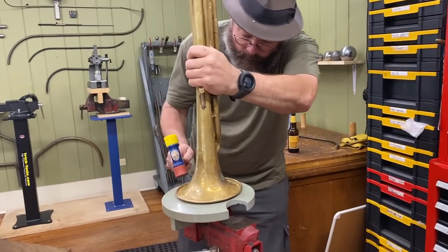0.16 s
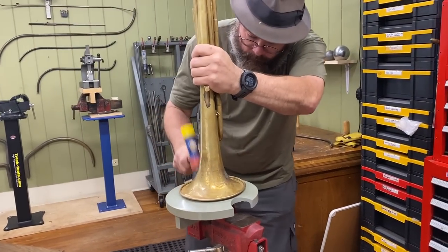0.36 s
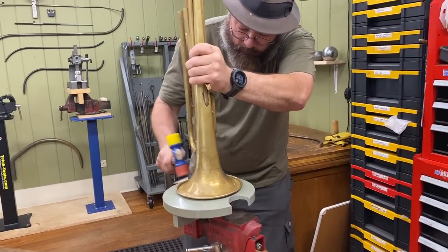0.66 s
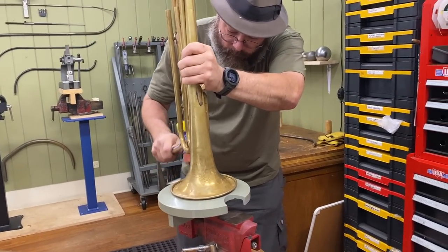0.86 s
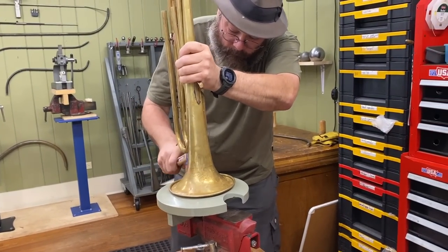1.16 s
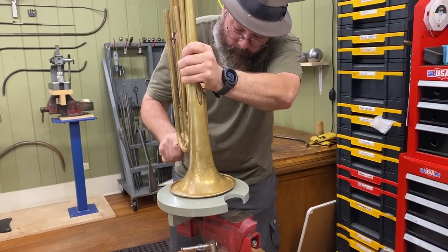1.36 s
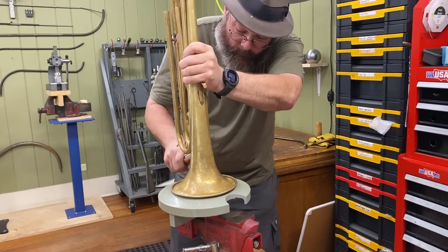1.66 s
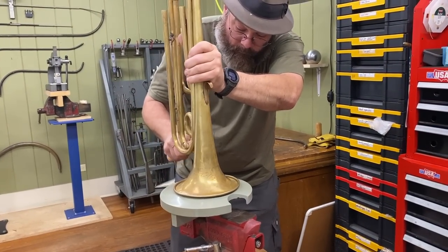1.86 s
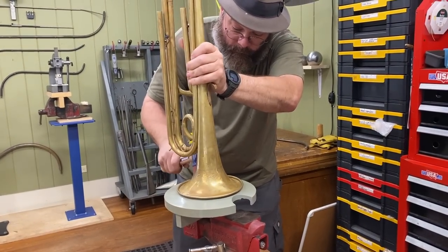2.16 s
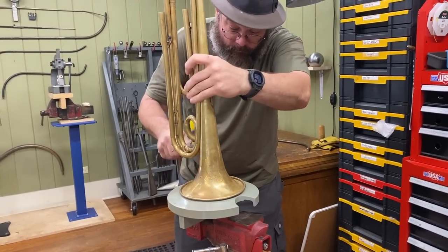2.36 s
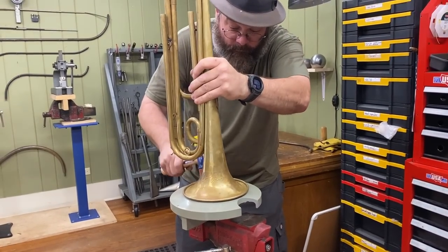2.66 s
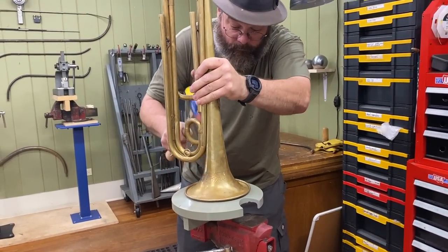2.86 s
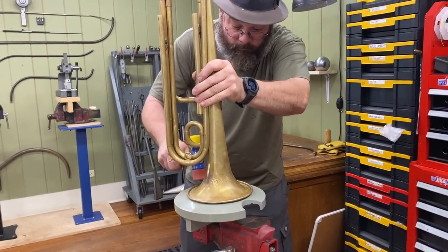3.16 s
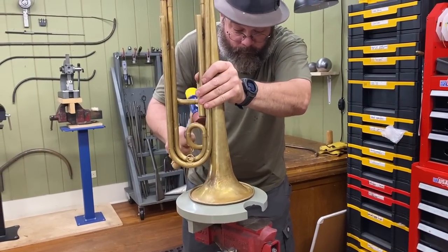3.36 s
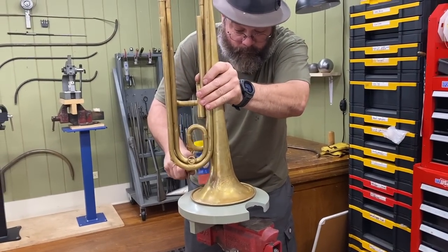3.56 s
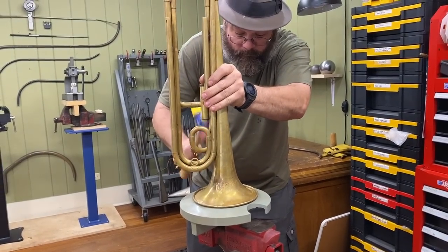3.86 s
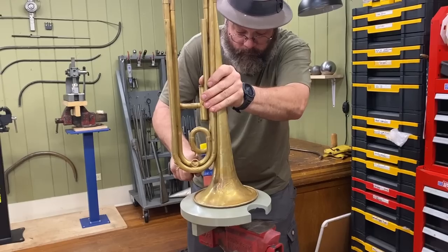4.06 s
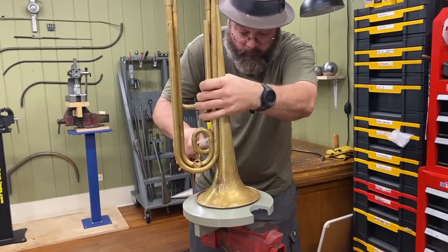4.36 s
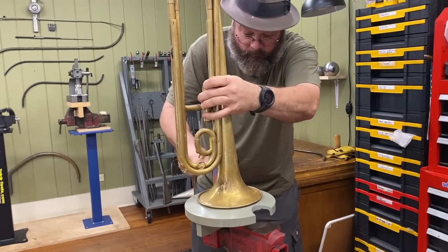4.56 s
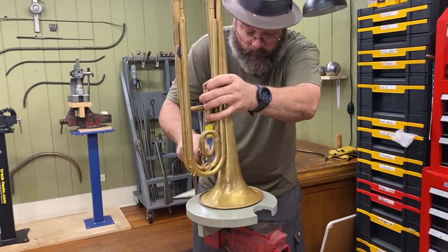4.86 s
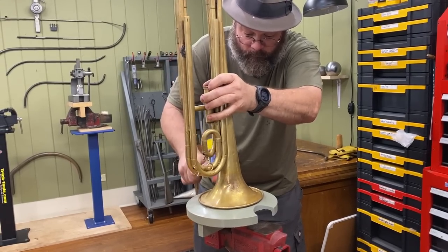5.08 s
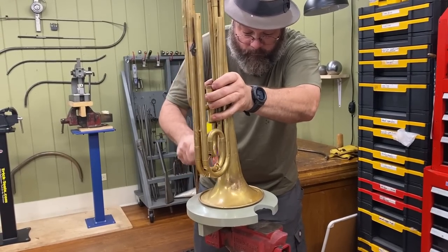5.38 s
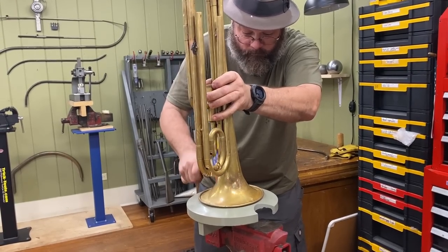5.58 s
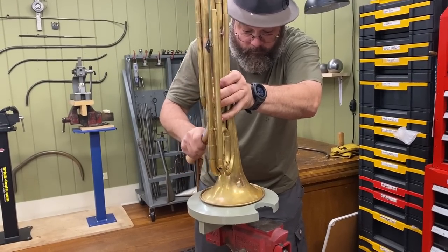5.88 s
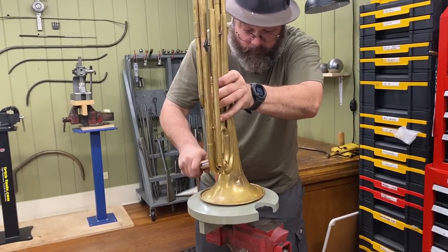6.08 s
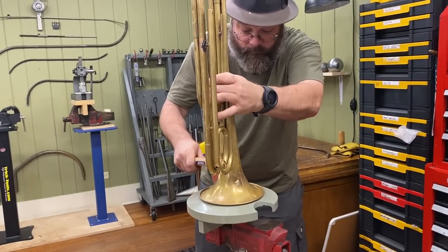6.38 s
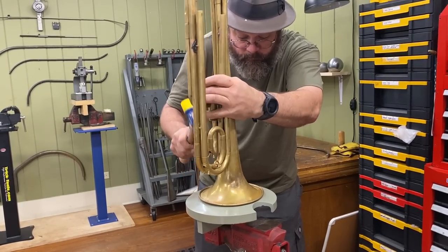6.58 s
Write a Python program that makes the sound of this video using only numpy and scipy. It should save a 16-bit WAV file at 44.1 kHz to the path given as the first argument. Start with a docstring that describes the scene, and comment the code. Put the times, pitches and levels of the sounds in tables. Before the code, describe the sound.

A mallet strikes a brass horn's flare twelve times, each blow a bright, damped clank with a thud, echoing in a small workshop.

```python
"""A small workshop rumbles faintly; a sleeve brushes and a brass horn shifts on its padded stand.
Then a mallet beats the horn's flare (its wide end) twelve times while a hand holds it down.
Each blow knocks the damped flare, cracks brightly, shakes stand and floor, and buzzes the rim.
A moment later the rim lands again, loose brass parts chatter and the room's echo dies away.
The horn shifts between blows and after the last one; a limiter flattens the loudest peaks."""
import sys
import numpy as np
from scipy import signal
from scipy.fft import rfft, irfft, next_fast_len
from scipy.io import wavfile
from scipy.ndimage import uniform_filter1d, map_coordinates

SR = 44100
rng = np.random.default_rng(int(sys.argv[2]) if len(sys.argv) > 2 else 0)


def to_wav(sig):
    """Store sig (one row per channel, or 1-D mono) as 16-bit WAV at the path in sys.argv[1].

    Samples outside -1..1 are clipped; the rate is SR.
    """
    pcm = np.clip(np.atleast_2d(sig), -1, 1) * 32767
    pcm = np.round(pcm).astype(np.int16)
    wavfile.write(sys.argv[1], SR, pcm.T)  # frames by channels


N = 296793

# mallet blows: (time [s], force [dB], hardness of contact [dB], clank [dB], favoured pitch [Hz],
# recoil buzz [dB], thud [dB])
BLOWS = [(0.3933, -11, -3, 4.5, 796, -16.5, -2), (1.1232, -8.5, -0.5, -3.5, 620, -15, -7),
         (1.5911, 0, -2.5, 6, 712, -5, 2), (2.0592, -2, -4.5, 3.5, 684, 2.5, 6),
         (2.554, -3.5, -1, 4, 656, 2.5, 4.5), (3.0214, -4, 1.5, 3.5, 640, 2, 10.5),
         (3.4707, -3.5, -2.5, 6.5, 706, -8, -3.5), (3.9243, -6.5, -4, 8.5, 755, 11, -5),
         (4.5881, -4, 0, 2.5, 822, 7, 2.5), (5.087, -2, -2, -1.5, 746, 7, -5.5),
         (5.564, -5.5, -8, -5, 705, 2, 1), (6.034, -2.5, -6, -0.5, 693, -2.5, 2.5)]
# the flare's tones, damped by hand and pad: (pitch [Hz], level [dB], time to fade by 60 dB [s])
FLARE = [(306, -9.5, 0.079), (418, -14.5, 0.24), (586.7, -4.5, 0.077), (699.6, -1, .09), (788, -2.5, 0.097),
         (800, -3.5, 0.029), (947, -7.5, 0.2)]
# its stiffer tones, which a squarer blow brings out: (pitch [Hz], level [dB], fade time [s])
CLANK = [(990, -1, .05), (1142, -2, 0.15), (1254, -3, 0.068), (1472, -2, 0.045), (1699, -7.5, 0.091),
         (1778, -14.5, 0.022), (1890, -7, .06), (2840, -24.5, 0.16)]
# the bright noise of struck brass: (frequency [Hz], level [dB])
CRACK = [(200, -5.5), (1200, 3.5), (2000, 2.5), (2500, -0.5), (3100, -0.5), (3700, -4), (5500, 2.5),
         (7300, 2), (8800, 4.5), (9800, 0), (11500, -10), (15500, -20)]
# the bright part of the room's echo: (frequency [Hz], level [dB])
HISS = [(1200, -15), (2100, -1.5), (2500, 2), (3100, 1), (3700, 0.5), (4600, -0.5), (7500, 1.5),
        (9200, -0.5), (10200, -5), (11500, -17), (13000, -19.5), (15500, -21.5)]

REBOUND_S = 0.061  # the horn hops on its pad and lands about this long after a blow


def amp(db):
    """Turn decibels into a factor to multiply by."""
    return 10 ** (np.asarray(db) / 20)


def unit(x):
    """Scale a sound to an average (rms) level of 1."""
    return x / np.sqrt(np.mean(x ** 2) + 1e-20)


def along(points, hz):
    """Read between (frequency [Hz], value) points, giving each octave equal space."""
    frequencies, values = np.transpose(points)
    return np.interp(np.log(hz + 1), np.log(frequencies + 1), values)


def noise(spectrum, ripple_db=0, size=SR):
    """Shaped noise; the ripple stands for the many small tones that each blow rings differently."""
    hz = np.fft.rfftfreq(size, 1 / SR)
    ripple = ripple_db * map_coordinates(rng.standard_normal(400), [hz / 75])
    white = rfft(rng.standard_normal(size))
    return unit(irfft(white * amp(along(spectrum, hz) + ripple), size))


def wobble(rate, size=SR):
    """A smooth curve through `rate` random points a second."""
    points = rng.standard_normal(int(size * rate / SR) + 4)
    return map_coordinates(points, [np.arange(size) * rate / SR])


def second():
    """The sample times of one second, the length of one event."""
    return np.arange(SR) / SR


def fade(t60, attack):
    """Rise in about `attack` seconds and fall by 60 dB every `t60` seconds."""
    t = second()
    return amp(-60 * t / t60) * (1 - np.exp(-t / attack))


def ring(tones, scatter_db, attack, blur_hz=0):
    """Struck metal's fading tones, a little different each time; rattling contact blurs their pitch."""
    out = np.zeros(SR)
    for hz, db, t60 in tones:
        drift = np.cumsum(rng.standard_normal(SR)) * np.sqrt(2 * np.pi * blur_hz / SR)
        phase = 2 * np.pi * (hz * second() + rng.random()) + drift
        out += amp(db + scatter_db * rng.standard_normal()) * fade(t60, attack) * np.sin(phase)
    return out


def add(track, s, sound):
    """Mix a sound into the track, starting at `s` seconds."""
    start = round(s * SR)
    track[start:start + len(sound)] += sound[:N - start]


def air():
    """The workshop's low rumble and faint hiss, slowly wavering."""
    # the background noise: (frequency [Hz], level [dB])
    rumble = [(20, 8), (45, 4), (88, -4.5), (255, -17), (780, -28), (1250, -30), (1600, -33), (3700, -44.5),
              (9500, -53), (11500, -59.5), (15500, -77.5)]
    return amp(-48.5 + 3.3 * wobble(rate=9.3, size=N)) * noise(rumble, size=N)


def rustle():
    """A sleeve brushes faintly and unevenly, swelling whenever the hand slides along the brass."""
    # the hand slides to a new grip: (time [s], level [dB])
    regrips = [(.07, -73), (2.4, -75), (2.9, -77), (4.52, -75), (6.55, -69)]
    # brushing cloth: (frequency [Hz], level [dB])
    cloth = [(1500, -11), (3500, -5), (6200, -4), (8500, -1.5), (10200, -0.5), (11500, -18.5), (15000, -25)]
    sleeve_db, half_slide_s = -82, 0.093
    t = np.arange(N) / SR
    slides = sum(amp(db) * np.exp(-((t - s) / half_slide_s) ** 2) for s, db in regrips)
    return (amp(sleeve_db) + slides) * amp(1.5 * wobble(rate=23, size=N)) * noise(cloth, size=N)


def shifts():
    """The horn is turned on its pad: it scuffs, ticks and lightly stirs the flare's stiffer tones."""
    # small moves of the horn: (time [s], relative scuff level [dB], relative tick level [dB])
    moves = [(0.054, -40.5, -54), (0.105, -42.5, -60.5), (0.588, -32.5, -42.5), (0.825, -46.5, -68),
             (0.879, -58.5, -60.5), (1.865, -34.5, -62), (2.354, -38.5, -57), (2.86, -40.5, -67),
             (4.292, -38.5, -64), (4.42, -39.5, -52), (6.449, -37.5, -62)]
    # brass rubbing on the pad: (frequency [Hz], level [dB])
    rubbing = [(100, -19.5), (300, 6.5), (800, -0.5), (1250, -3), (2000, -15), (3000, -26.5), (9000, -38)]
    out = np.zeros(N)
    for s, scuff_db, tick_db in moves:
        tap = amp(-7) * ring(CLANK, scatter_db=2.5, attack=0.003, blur_hz=29.8)
        scuff = noise(rubbing) * fade(t60=0.031, attack=0.003)
        scuff += amp(-8) * room_tail(rubbing, build=0.0018)
        tick = noise(CRACK) * fade(t60=0.03, attack=0.0005)
        tick += amp(-13.5) * room_tail(HISS, build=0.011)
        add(out, s, amp(scuff_db) * (tap + scuff) + amp(tick_db + 2.5) * tick)
    return out


def room_tail(spectrum, build):
    """The room's echo of a short sound: it swells in about `build` seconds; high notes die first."""
    # how long the workshop echoes: (frequency [Hz], fade time [s])
    fade_times = [(100, .45), (400, .47), (1000, .43), (2500, .41), (6000, .39), (9000, .37), (12000, .315),
                  (16000, .27)]
    hz, t, bands = signal.stft(noise(spectrum, ripple_db=2.5), SR, nperseg=256)
    decay = amp(-60 * t / along(fade_times, hz)[:, None])
    tail = signal.istft(bands * decay, SR, nperseg=256)[1][:SR]
    return tail * (1 - np.exp(-second() / build))


def mallet():
    """Each blow knocks the flare and cracks brightly; the room answers and the metal rings on."""
    # the deep part of the room's echo: (frequency [Hz], level [dB])
    low_echo = [(60, -22.5), (150, -0.5), (300, 2), (450, 2.5), (560, 0), (690, 1), (790, 6), (960, -5.5),
                (1130, 0), (1300, -7), (1850, -5.5), (2600, -19), (5000, -46)]
    # thin brass sings on briefly: (pitch [Hz], level [dB], fade time [s])
    thin_brass = [(1800, 0, .4), (3080, -2, .42), (4511, -4, .46), (4600, -8, .44), (4807, -7, .48),
                  (6379, -2, .28), (8560, -3, .25), (9286, 2.5, .37), (10030, -8, .25)]
    # the free tubing rings longest: (pitch [Hz], level [dB], fade time [s])
    tube_tones = [(1136, 7, .8), (1663, 4, .8), (2783, -2, .7), (3537, -4, .7), (4807, -5, .75),
                  (6261, 3.5, 1.0)]
    # how freely the holding hand lets the tubing ring: (time [s], level [dB])
    tube_freedom = [(.4, -67), (1.12, -57.5), (1.6, -65.5)]
    out = np.zeros(N)
    for s, force_db, hard_db, clank_db, pitch_hz, *_ in BLOWS:
        # the spot that is struck favours the flare's tones near one pitch
        tones = [(hz, db + 6 * np.exp(-((hz - pitch_hz) / 70) ** 2), t60) for hz, db, t60 in FLARE]
        # a harder contact gives less knock and more treble
        knock_db = -9 + 0.24 * force_db - 0.4 * hard_db
        treble_db = force_db + 0.3 * hard_db
        knock = amp(knock_db) * ring(tones, scatter_db=0.5, attack=0.002)
        clank = ring(CLANK, scatter_db=2, attack=0.0017, blur_hz=8.3)
        clank *= amp(-13.5 + force_db + clank_db)
        # the rim buzzes against the pad, so the crack is a ragged run of contacts
        contacts = unit(amp(2.8 * wobble(rate=900))) * noise(CRACK, ripple_db=2.5)
        crack = amp(-3.5 + force_db + hard_db) * contacts * fade(t60=0.1, attack=0.00071)
        boom = amp(-9 + force_db) * room_tail(low_echo, build=0.0098)
        hiss = amp(-12 + treble_db) * room_tail(HISS, build=0.035)
        shimmer = amp(-26 + treble_db) * ring(thin_brass, scatter_db=2.5, attack=0.012, blur_hz=22)
        tubing_db = np.interp(s, *np.transpose(tube_freedom))
        tubing = amp(tubing_db) * ring(tube_tones, scatter_db=3.5, attack=0.0037)
        add(out, s, knock + clank + crack + boom + hiss + shimmer + tubing)
    return out


def stand():
    """A blow thuds into the pad and goes down the stand to the floor, which shudders alike each time."""
    # tones of the stand and wooden floor: (pitch [Hz], level [dB], fade time [s])
    floor_tones = [(17.47, -23, 1.2), (31.32, -23, 0.98), (46.9, -27.5, 0.95), (64.14, -22, 0.69),
                   (78.4, -30.5, 0.65), (106.2, -17, 0.42), (124.6, -25, 0.33), (158.7, -24, .4),
                   (189, -25.5, 0.43), (218.7, -27.5, .35), (243.5, -24, .35), (317, -26.5, 0.5),
                   (382, -29.5, 0.13)]
    # the dull push into the pad: (frequency [Hz], level [dB])
    pad_push = [(30, -5.5), (60, 2.5), (110, -0.5), (170, -2), (320, -0.5), (450, -11), (800, -31.5)]
    out = np.zeros(N)
    shudder = sum(amp(db) * fade(t60, attack=0.026) * np.sin(2 * np.pi * hz * second())
                  for hz, db, t60 in floor_tones)
    for s, force_db, *_, thud_db in BLOWS:
        thud = amp(-21 + force_db + thud_db) * noise(pad_push) * fade(t60=0.32, attack=0.0047)
        add(out, s, thud + amp(2.5 + 0.65 * force_db) * shudder)
    return out


def buzz(length_s, hz, tick_db):
    """A burst of tiny contacts rings one high tone of loose brass and adds a bright tick."""
    t = second()
    burst = np.exp(-(t / length_s) ** 4) * (1 - np.exp(-t / 0.0004))
    contacts = (rng.random(SR) < 2500 / SR) * rng.standard_normal(SR)  # about 2500 a second
    # a longer buzz settles into a purer tone
    ping = fade(t60=length_s, attack=0.0001) * np.sin(2 * np.pi * hz * t)
    tone = burst * signal.fftconvolve(contacts, ping)[SR // 2:][:SR]
    tone *= np.linalg.norm(burst) / np.linalg.norm(tone)
    tick = amp(tick_db) * burst * noise(CRACK)
    return in_room(amp(-4) * (tone + tick), echo_db=-7)


def in_room(x, echo_db):
    """A sound followed by its echo in the workshop."""
    tail = room_tail([(100, 8), (9500, -11), (15000, -12.5)], build=0.002)
    return x + amp(echo_db) * signal.fftconvolve(x, tail / np.linalg.norm(tail))[:SR]


def chatter(bounces=3):
    """The rim buzzes as the mallet springs back; then loose brass bounces and sometimes zings out."""
    # a loose part catches and zings: (time [s], relative level [dB], length [s], pitch [Hz])
    zings = [(1.7, -17, 0.01, 9400), (2.156, -20, .006, 8700), (3.08, -4.5, 0.0043, 8740),
             (3.134, -23, 0.014, 9400), (3.543, -16.5, .011, 9270), (5.169, -17.5, 0.015, 9290),
             (6.136, -19, 0.0092, 9000)]
    # the thin tone that a zing builds up: (pitch [Hz], level [dB], fade time [s])
    zing_tone = [(9283, -14, .33)]
    buzz_hz, bounce_gap_s, bounce_loss_db = 9040, 0.024, 1
    out = np.zeros(N)
    for s, force_db, *_, recoil_db, _ in BLOWS:
        recoil = buzz(length_s=0.012, hz=buzz_hz, tick_db=5.5)
        add(out, s + 0.0125, amp(-16 + force_db + recoil_db) * recoil)
        # each bounce strays at random in time, level and pitch
        for k, (late, loud, sharp) in enumerate(rng.standard_normal((bounces, 3))):
            delay = REBOUND_S + k * bounce_gap_s + 0.005 * late
            db = -26 + force_db - k * bounce_loss_db + 9.5 * loud
            bounce = buzz(length_s=0.007, hz=buzz_hz + 192 * sharp, tick_db=-1)
            add(out, s + delay, amp(db) * bounce)
    for s, db, length_s, hz in zings:
        build_up = length_s / 0.02  # a longer zing leaves a louder tone
        tone = build_up * ring(zing_tone, scatter_db=5, attack=0.002, blur_hz=14)
        add(out, s, amp(db) * (buzz(length_s, hz, tick_db=-13.5) + tone))
    return out


def rebounds():
    """After each blow the rim lands again with a tick and a smaller, shorter clank."""
    out = np.zeros(N)
    for s, force_db, *_, thud_db in BLOWS:
        clank = ring(FLARE + CLANK, scatter_db=1.5, attack=0.0006, blur_hz=30)
        clank *= fade(t60=0.11, attack=0.0002)
        delay = REBOUND_S + 0.003 * rng.standard_normal()
        # the more of the blow sinks into the pad, the less the horn hops
        db = -23 + 0.37 * force_db - 0.6 * thud_db
        tick = amp(-5.5) * noise(CRACK) * fade(t60=0.023, attack=0.0003)
        add(out, s + delay, in_room(amp(db) * (clank + tick), echo_db=-8.5))
    return out


def scene():
    """All the sounds added together in one channel."""
    return (mallet() + rebounds() + stand() + chatter() + shifts() + rustle() + air())[None]


def limiter(x, ceiling_db, release_db_per_s):
    """Turn the volume down when a few milliseconds are louder than the ceiling, then ease it back."""
    power = np.abs(uniform_filter1d(x ** 2, size=180))
    excess_db = np.maximum(0, 10 * np.log10(power + 1e-18) - ceiling_db)
    ramp = release_db_per_s * np.arange(N) / SR
    cut_db = np.maximum.accumulate(excess_db + ramp, axis=-1) - ramp
    return x * amp(-uniform_filter1d(cut_db, size=60))


def record(dry):
    """Hold down the loud moments, round off the peaks and remove the very highest treble."""
    peak_db, top_hz = -6.5, 16400
    held = limiter(dry, ceiling_db=-10, release_db_per_s=51)
    rounded = held / (1 + np.abs(held / amp(peak_db)) ** 6) ** (1 / 6)
    size = next_fast_len(N + SR)
    treble_cut = np.clip((top_hz - np.fft.rfftfreq(size, 1 / SR)) / 900, 0, 1) ** 2
    return irfft(rfft(rounded, size) * treble_cut, size)[:, :N]


dry = scene()
out = record(dry)
to_wav(out)
```